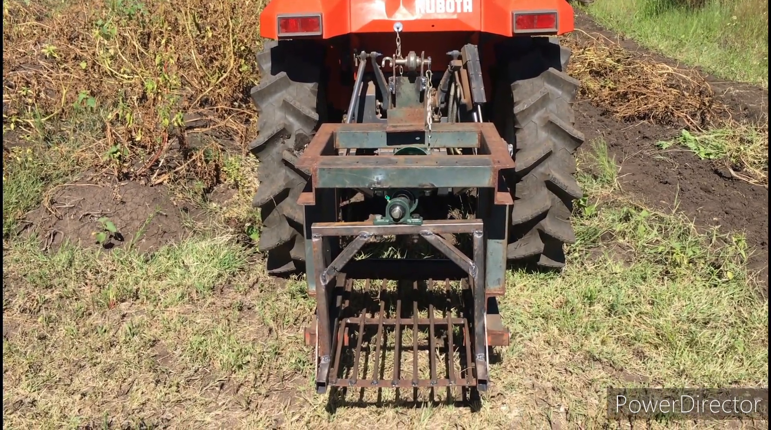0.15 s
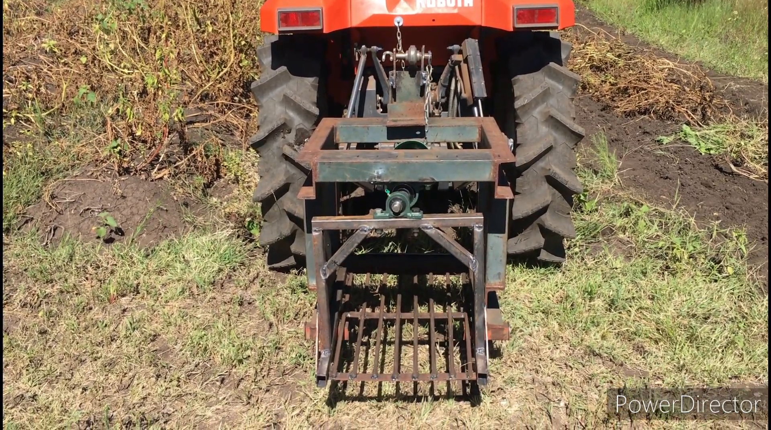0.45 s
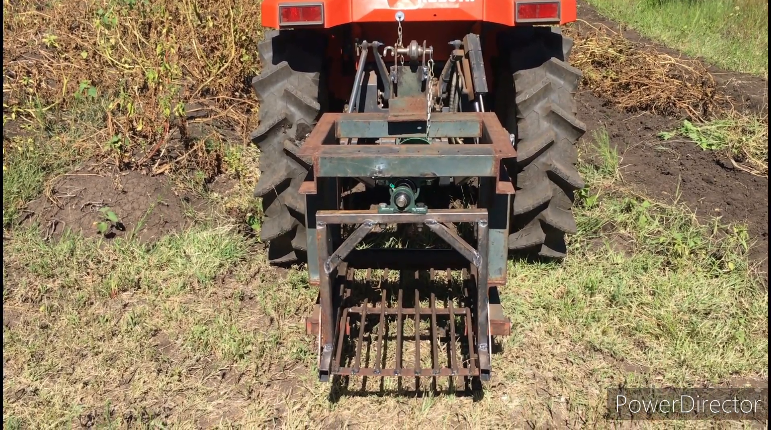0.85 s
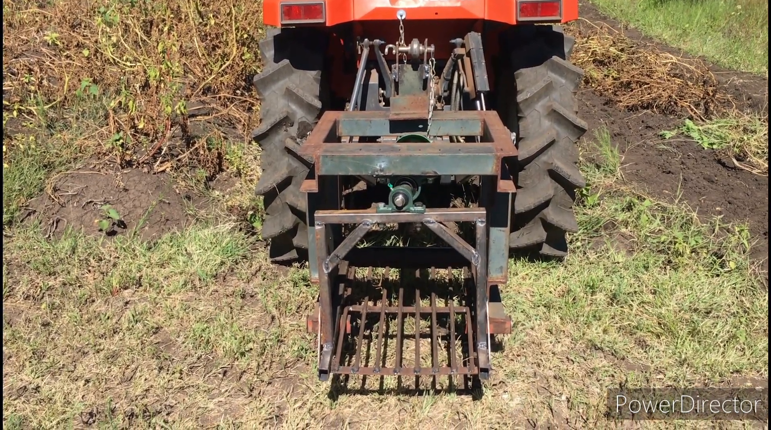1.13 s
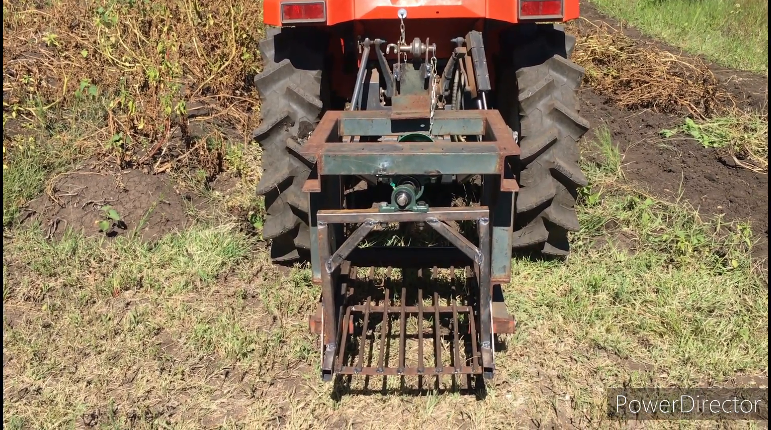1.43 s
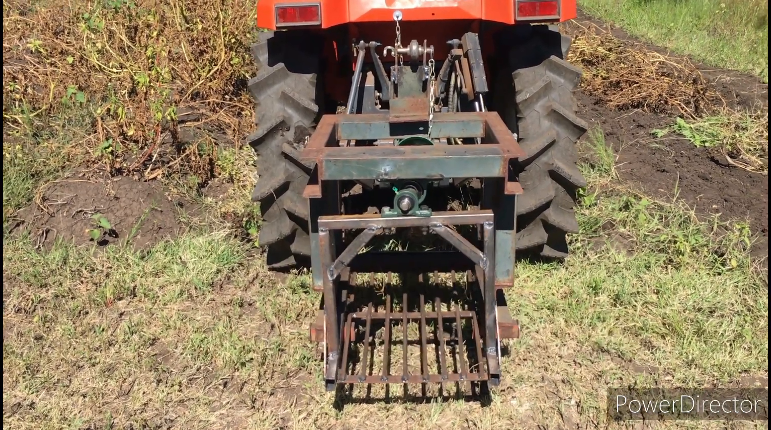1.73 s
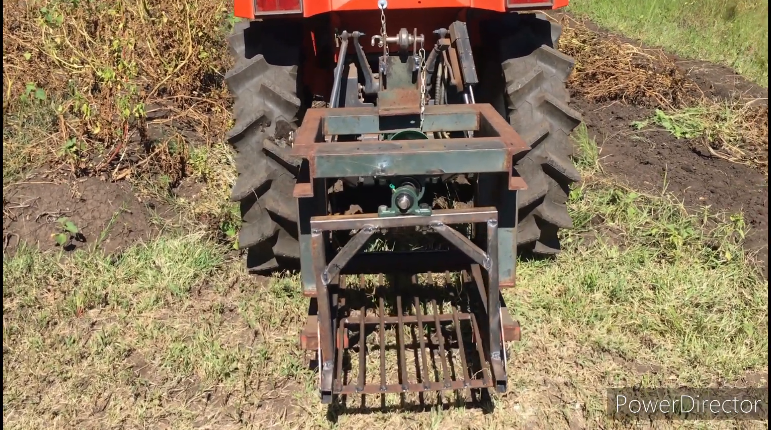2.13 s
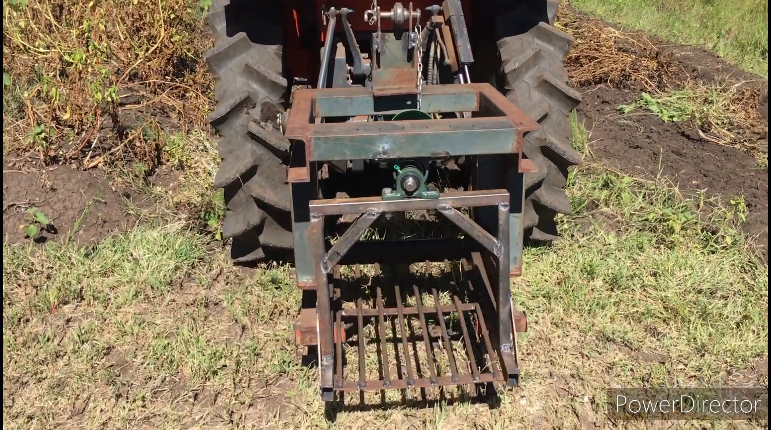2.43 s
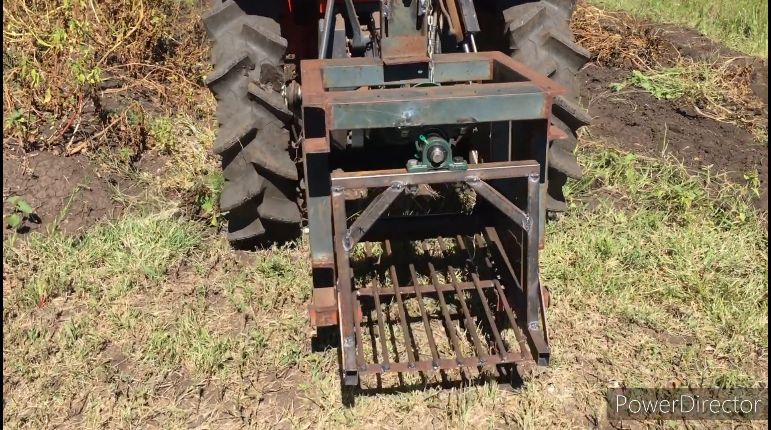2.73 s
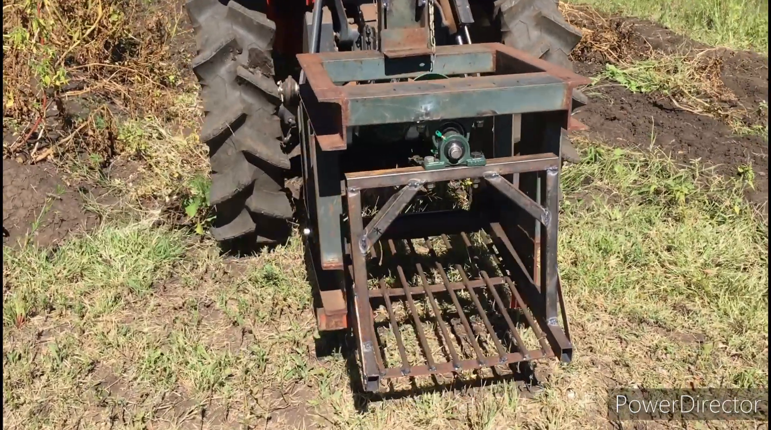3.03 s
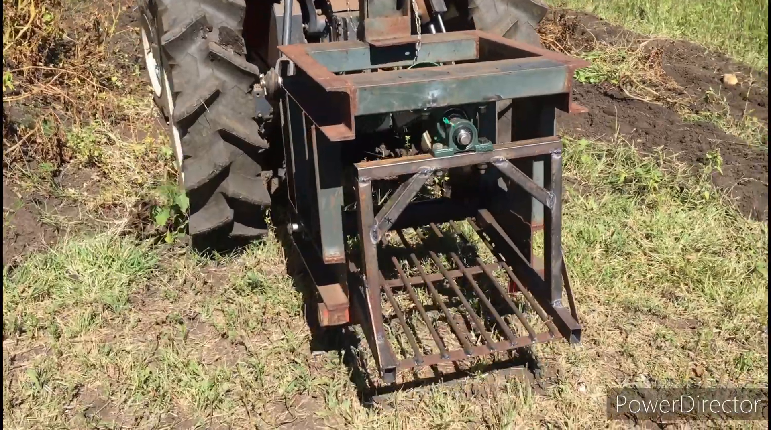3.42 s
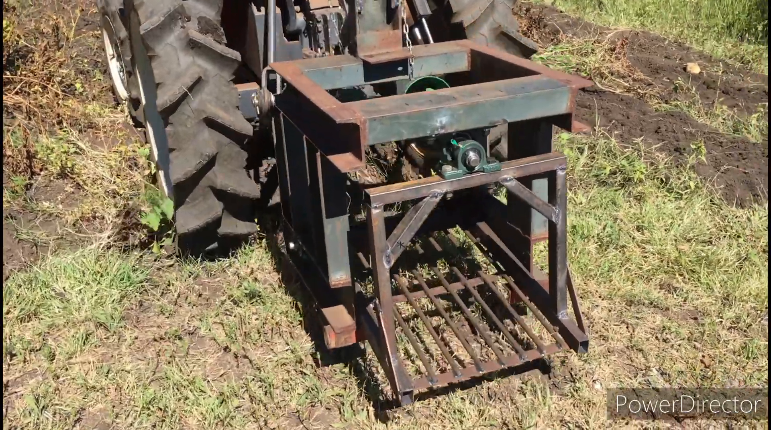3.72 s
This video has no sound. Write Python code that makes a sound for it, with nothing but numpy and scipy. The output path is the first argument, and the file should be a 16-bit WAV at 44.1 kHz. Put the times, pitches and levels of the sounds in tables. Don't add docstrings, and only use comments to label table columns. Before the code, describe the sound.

Steel digger cage rattles to a stop, then restarts in heavy metallic clanks over diesel idle.

```python
import sys
import numpy as np
from scipy import signal
from scipy.fft import rfft, irfft, next_fast_len
from scipy.io import wavfile
from scipy.ndimage import map_coordinates

SR = 44100
rng = np.random.default_rng(int(sys.argv[2]) if len(sys.argv) > 2 else 0)


def ratio_of_db(decibels):
    return 10 ** (np.asarray(decibels, float) / 20)


def unload_wav(signal):
    wavfile.write(
        sys.argv[1],
        SR,
        np.round(np.clip(np.atleast_2d(signal).T, -1, 1) * 32767).astype(np.int16),
    )


N = 170667

# start_s, level_db (peak), brightness_db
SLOWING_SHAKES = [(0.0, -48.5, -0.5), (0.0518, -51.5, -3), (0.0953, -45.5, 0.5), (.128, -56.5, -3),
                  (.15, -61, 3), (0.175, -48, -1), (.187, -50, -1), (.212, -51, 1), (0.2294, -45.5, 0.5),
                  (.242, -56, 3), (.279, -57, -8), (0.3067, -51, -1), (.32, -50.5, -0.5),
                  (0.3631, -46.5, 1), (.39, -65, -7), (0.414, -62, 5.5), (0.4504, -55.5, -4),
                  (0.4913, -55, -1.5), (0.5287, -51.5, -3), (.57, -62.5, -5), (0.612, -60, 0.5),
                  (0.6549, -53.5, -1), (.7, -62, -6), (0.7432, -57, -7), (0.7994, -67, -3),
                  (0.8594, -75, -6.5)]
# start_s, level_db (peak), brightness_db
HEAVY_BLOWS = [
    (2.616, -41, 1),
    (2.7486, -37, 1.5),
    (2.8778, -37, 3),
    (3.0146, -36, 1.5),
    (3.1421, -37.5, 1),
    (3.271, -34, 2),
    (3.394, -34.5, 1),
    (3.5154, -34.5, 2.5),
    (3.6354, -34.5, 4),
    (3.7602, -35, 1),
]
# start_s, level_db (peak), brightness_db
LIGHT_TICKS = [(2.47, -67, -2), (2.5089, -58.5, 3), (2.535, -55.5, -3), (2.562, -58, -9),
               (2.588, -51.5, -3.5), (2.7067, -46.5, -1.5), (2.8392, -44, 2), (2.9724, -46, 0.5),
               (3.106, -41.5, 1.5), (3.2356, -44.5, 3.5), (3.3605, -40.5, 0.5), (3.479, -39, 2),
               (3.6026, -42.5, -1), (3.7226, -40.5, 2.5), (3.847, -42.5, 0)]
# start_s, level_db (peak), brightness_db
CAGE_REBOUNDS = [(2.884, -49, -13), (3.279, -42.5, -1.5), (3.403, -52, -5), (3.646, -39.5, -5),
                 (3.77, -42, -6), (2.6594, -45.5, -9.5), (2.7894, -47, -12), (2.9287, -44.5, -5),
                 (3.0609, -40, 1), (3.1794, -42, -5), (3.3094, -45.5, -6), (3.4294, -40, 1),
                 (3.5494, -40.5, -6.5), (3.6694, -52, 1), (3.708, -41, -5), (3.7994, -45, 3.5),
                 (3.8322, -34.5, -2)]
# pitch_hz, width_hz, slowing_db, starting_db, full_speed_db
CAGE_MODES = [(520.4, 22.4, 2.5, -3.5, 2.5), (599, 11, -3, 2, 2.5), (820, 30, 5, -25, -4),
              (902, 14, -8, -10, 6), (1106, 30, 2, 3, -1), (1249, 15, 9, 7, -3), (1401.6, 23.5, 2, 7.5, 7),
              (1700, 34, 3, -3, -3), (1771.5, 16, 2, 8, 1), (1887, 37, 5, 4, 5.5), (2120, 14.7, -5, -8, 4),
              (2384, 31, -18, -9, 2), (2770, 21, -13, -7, -2), (3170, 8.1, -3, 2, -24)]
MODE_STAGES = [1.0, 2.8, 3.4]
# pitch_hz, level_db (per Hz)
FRAME_COLOUR = [(250, -26.5), (480, -3.5), (650, 0.5), (2300, -7.5), (3200, -19), (7000, -34.5),
                (9000, -45.5), (16000, -53)]
# pitch_hz, level_db (per Hz)
SLOWING_COLOUR = [(210, -63), (350, -12.5), (526, 3.5), (654, -5), (882, 3), (1910, -3.5), (2610, -10),
                  (9000, -35.5), (11700, -64), (19800, -120)]
# pitch_ratio, level_db, t60_s
PIN_PARTIALS = [
    (1, -6, .07),
    (1.51, -26, .04),
]
# time_s, level_db
PIN_LEVEL = [
    (0, 4.5),
    (2.5, -14),
    (2.9, -12),
    (3.1, -4),
    (3.87, -9),
]
# time_s, firing_rate_hz, exhaust_db, muffler_hum_db
ENGINE_SPEED = [(0.0, 33.3, -58.5, 1.5), (.25, 33.38, -58.5, 1.5), (.6, 33.92, -59, 1),
                (.9, 34.27, -59, .5), (1.25, 34.23, -59, .5), (1.75, 34.37, -59.5, 1.5),
                (2.2, 34.04, -59, .5), (2.55, 33.46, -58, -1), (2.8, 33.56, -57.5, -2),
                (3.0, 32.85, -57, -3), (3.09, 33.2, -56.5, -3), (3.35, 36.4, -58.5, -4),
                (3.5, 36.42, -58.5, -3.5), (3.7, 35.7, -58.5, -2.5), (3.87, 35.4, -58, -1.5)]
# pitch_hz, level_db
PIPE_COLOUR = [(18, 0), (34, 1), (68, 3.5), (102, -15), (137, 0), (170, -6.5), (206, -10.5), (270, -30),
               (420, -43)]
# time_s, level_db
PIPE_SINGING = [
    (0, 0),
    (3.1, 1),
    (3.35, 3.5),
    (3.6, 4),
    (3.87, -0.5),
]
# pitch_hz, level_db (per Hz)
ROAR_COLOUR = [(40, -29), (90, -4.5), (150, -4), (220, -6.5), (300, -10.5), (500, -42), (700, -86)]
# pitch_hz, level_db (per Hz)
CLATTER_COLOUR = [(180, 3.5), (300, -4.5), (527, -9.5), (1080, -13.5), (1210, -13), (1370, -15.5),
                  (1850, -21.5), (6000, -32.5), (7800, -64), (13200, -120)]
# teeth_per_firing, blur_hz, level_db
GEAR_WHINES = [
    (31.2, 50, -76.5),
    (40.2, 40, -77.5),
    (50, 40, -84),
]
# start_s, level_db, pitch_hz, t60_s, direction (push
BUMPS_AND_PINGS = [(1.305, -52.5, 250, 0.11, 1), (1.4019, -33.5, 90.6, 0.055, -1.1),
                   (1.4244, -36.5, 144, 0.059, 1), (1.443, -39, 106, 0.11, -0.92), (1.458, -45, 90, 0.072, -1),
                   (1.4774, -36.5, 90, 0.082, -1.13), (1.51, -45, 76, 0.074, -1),
                   (1.5752, -37, 85.4, .2, 0.92), (1.628, -39, 135, 0.098, 0.95), (1.637, -37, 70, .05, -1.5),
                   (1.6486, -38, 334, 0.041, 1), (1.6575, -32, 98, 0.07, -1.2), (2.661, -40, 70, 0.18, 1),
                   (2.789, -44, 132.4, .15, 1), (2.747, -31, 114.5, 0.042, 1), (3.105, -40, 130, 0.062, 1),
                   (3.14, -28, 72.2, 0.082, 0.9), (3.598, -40, 109, 0.054, 1), (0.49, -60, 3870, .0408, 1),
                   (2.527, -63, 1447, .33, 1), (2.533, -67, 1103, .335, 1)]
# start_s, level_db, pitch_hz, length_s
GRIP_CREAKS = [(1.388, -48.5, 158, 0.12), (1.655, -61, 580, 0.017), (1.288, -62.5, 1430, 0.0072),
               (1.292, -72, 3600, 0.0078), (1.303, -64, 720, 0.017), (1.64, -57, 990, 0.025),
               (1.566, -52.5, 590, 0.017), (1.5, -52, 410, .018), (1.648, -57.5, 1460, 0.0023),
               (1.6475, -51.5, 710, 0.0066), (1.665, -56.5, 870, 0.011), (1.5, -50, 420, 0.0084)]
# pitch_hz, level_db (per Hz)
HISS_COLOUR = [(1500, -1), (2500, -4), (6900, -5), (7800, -7.5), (9400, -5.5), (10500, -11.5), (11300, -8),
               (15700, -12)]

FINE_MODES_DB, FINE_MODES_HZ = 2.5, 35
MODE_SCATTER_DB, PIN_SCATTER_DB = 2, 1.5
GRAIN_DB, GRAIN_S = 3, 0.003
STRIKE, STRIKE_S = 0.26, 0.004
LOW_HZ, LOW_RISE_S = 1280, 0.0075
FIRST_TURN = 0.385
ODD_SHARE, SIZE_DB, TIME_JITTER = 0.07, 0.8, 0.008
PUFF_HZ, EXHAUST_DB = 8, 8
HUM_HZ, HUM_WIDTH_HZ, HUM_LAG_S = 68, 9.7, 0.0021
NOTE_HZ, NOTE_WIDTH_HZ = 144, 29
ROAR_DB, CLATTER_DB, SWELL_DB = -61.8, -65.5, 1.2
GATE = 0.14
HISS_DB = -73


def unit(x):
    return x / np.sqrt(np.mean(x ** 2) + 1e-20)


def along(points, hz):
    f, v = np.transpose(points)
    return ratio_of_db(np.interp(np.log(hz + 1), np.log(f + 1), v, left=-120, right=-120))


def wobble(rate):
    knots = rng.standard_normal(int(N * rate / SR) + 4)
    return map_coordinates(knots, [np.arange(N) * rate / SR])


def filtered(x, response):
    m = next_fast_len(len(x) + SR // 4)
    return irfft(rfft(x, m) * response(np.fft.rfftfreq(m, 1 / SR)), m)[:len(x)]


def causal(gain):
    c = irfft(np.log(gain + 1e-4))
    c[1:len(c) // 2] *= 2
    c[len(c) // 2 + 1:] = 0
    return np.exp(rfft(c))


def rings(peaks, f):
    total = 0
    for k, (c, w, db) in enumerate(peaks):
        total = total + (-1) ** k * ratio_of_db(db) * 1j * f * w / (c * c - f * f + 1j * f * w)
    return total


def rush(spectrum):
    return unit(filtered(rng.standard_normal(N), lambda f: along(spectrum, f)))


def digger():
    fine = ratio_of_db(FINE_MODES_DB * rng.standard_normal(640))
    slowing = rattle(SLOWING_SHAKES, SLOWING_COLOUR, fine, hold_s=0.01, t60=0.22, rise_s=0.00078,
                     broad_db=0, gain_db=7, pin_db=-10.5, pin_hz=2478)
    blows = rattle(HEAVY_BLOWS, FRAME_COLOUR, fine, hold_s=0.0067, t60=0.244, rise_s=0.00049,
                   broad_db=1.0, gain_db=4.0, pin_db=-4.5, pin_hz=2400)
    ticks = rattle(LIGHT_TICKS, FRAME_COLOUR, fine, hold_s=0.015, t60=0.16, rise_s=0.00094,
                   broad_db=1.5, gain_db=4, pin_db=5.5, pin_hz=2478)
    rebounds = rattle(CAGE_REBOUNDS, FRAME_COLOUR, fine, hold_s=0.0051, t60=0.3, rise_s=0.011,
                      broad_db=-4.5, gain_db=3.5, pin_db=-12, pin_hz=2478)
    return slowing + blows + ticks + rebounds


def rattle(events, spectrum, fine, hold_s, t60, rise_s, broad_db, gain_db, pin_db, pin_hz):
    out, t = np.zeros(N + SR), np.arange(SR // 4) / SR
    decay = ratio_of_db(-60 * np.maximum(t - hold_s, 0) / t60)
    shape = (1 - np.exp(-t / rise_s)) * decay * (1 + STRIKE * np.exp(-t / STRIKE_S))
    for s, db, bright_db in events:
        scatter = MODE_SCATTER_DB * rng.standard_normal(len(CAGE_MODES))
        modes = [(c, w, np.interp(s, MODE_STAGES, levels) + b)
                 for (c, w, *levels), b in zip(CAGE_MODES, scatter)]

        def colour(f):
            tilt = ratio_of_db(broad_db + bright_db * np.log2(np.minimum(f, 8000) / 1500 + 0.096))
            small_modes = np.interp(f / FINE_MODES_HZ, np.arange(len(fine)), fine)
            bars = abs(rings(modes, f)) / (1 + (f / 3500) ** 2)
            return causal(np.hypot(bars, tilt * along(spectrum, f) * small_modes))

        grains = ratio_of_db(GRAIN_DB * np.interp(t / GRAIN_S, np.arange(99), rng.standard_normal(99)))
        swarm = rng.standard_normal(len(t)) * unit(grains)
        low = filtered(swarm, lambda f: 1 / (1 + (f / LOW_HZ) ** 4))
        ring = filtered((swarm - low * np.exp(-t / LOW_RISE_S)) * shape, colour)
        ping = 0
        for ratio, level, pin_t60 in PIN_PARTIALS:
            a, b = rng.standard_normal(2)
            tone = np.sin(2 * np.pi * pin_hz * ratio * (1 + 0.0016 * b) * t)
            ping = ping + ratio_of_db(level + PIN_SCATTER_DB * a - 60 * t / pin_t60) * tone
        knock_db = db + pin_db + np.interp(s, *np.transpose(PIN_LEVEL))
        out[round(s * SR):][:len(t)] += ratio_of_db(db + gain_db) * ring + ratio_of_db(knock_db) * ping
    return out[:N]


def engine():
    s, hz, db, hum_db = np.transpose(ENGINE_SPEED)
    t = np.arange(-SR // 4, N) / SR
    turns = np.cumsum(np.interp(t, s, hz)) / SR + FIRST_TURN
    sound = exhaust(t, turns, hz.mean(), np.interp(t, s, db), np.interp(t, s, hum_db))
    turns = turns[-N:]
    beat = 1 + GATE * np.cos(2 * np.pi * turns)
    return sound[-N:] + roar_and_clatter(beat) + gear_whine(turns, beat)


def exhaust(t, turns, mean_hz, level_db, hum_db):
    at = np.flatnonzero(np.diff(np.floor(turns)) > 0)
    size, late = rng.standard_normal((2, len(at)))
    alternate = 1 + ODD_SHARE * (-1.0) ** np.arange(len(at))
    delay = 99 + np.round(late * TIME_JITTER * SR / mean_hz).astype(int)
    pulses = np.zeros(len(t) + SR)
    pulses[at + delay] = ratio_of_db(SIZE_DB * size) * alternate
    pipe = lambda f: along(PIPE_COLOUR, f) * np.exp(-1j * np.arctan(f / PUFF_HZ))
    puffs = unit(filtered(pulses, pipe)[:len(t)])
    hum_band = lambda f: np.exp(-((f - HUM_HZ) / HUM_WIDTH_HZ) ** 2)
    hum = np.roll(filtered(puffs, hum_band), round(HUM_LAG_S * SR))
    note = filtered(puffs, lambda f: np.exp(-((f - NOTE_HZ) / NOTE_WIDTH_HZ) ** 2))
    note = note * (ratio_of_db(np.interp(t, *np.transpose(PIPE_SINGING))) - 1)
    rest = filtered(puffs, lambda f: 1 - hum_band(f))
    return ratio_of_db(level_db + EXHAUST_DB) * (rest + ratio_of_db(hum_db) * hum + note)


def roar_and_clatter(beat):
    roar = ratio_of_db(ROAR_DB + SWELL_DB * wobble(7.78)) * beat * rush(ROAR_COLOUR)
    clatter = ratio_of_db(CLATTER_DB + SWELL_DB * wobble(9.9)) * beat * rush(CLATTER_COLOUR)
    return roar + clatter


def gear_whine(turns, beat):
    whine = 0
    for teeth, blur, level in GEAR_WHINES:
        whine = whine + ratio_of_db(level) * wobble(blur) * beat * np.sin(2 * np.pi * teeth * turns)
    return whine


def camera():
    out, t = np.zeros(N + SR), np.arange(SR // 5) / SR
    for s, db, hz, t60, way in BUMPS_AND_PINGS:
        bump = np.sin(2 * np.pi * hz * t) * (1 - np.exp(-t / 0.0015))
        out[round(s * SR):][:len(t)] += way * ratio_of_db(db - 60 * t / t60) * bump
    for s, db, hz, length in GRIP_CREAKS:
        scrape = rng.standard_normal(len(t)) * (t / length) * np.exp(1 - t / length * 2.54)
        creak = filtered(scrape, lambda f: rings([(hz, 0.5 * hz, 0)], f) ** 2)
        out[round(s * SR):][:len(t)] += ratio_of_db(db + 24.5) * creak
    return filtered(out[:N], lambda f: (1j * f / (1j * f + 45)) ** 2)


def hiss():
    return ratio_of_db(HISS_DB) * rush(HISS_COLOUR)


def scene():
    return (digger() + engine() + camera() + hiss())[None]


def low_pass(x):
    return signal.sosfilt(signal.butter(12, 15550, fs=SR, output="sos"), x)


def record(dry):
    mix = filtered(dry[0], lambda f: (1j * f / (1j * f + 20)) ** 2)[None]
    return low_pass(mix)


dry = scene()
out = record(dry)
unload_wav(out)
```